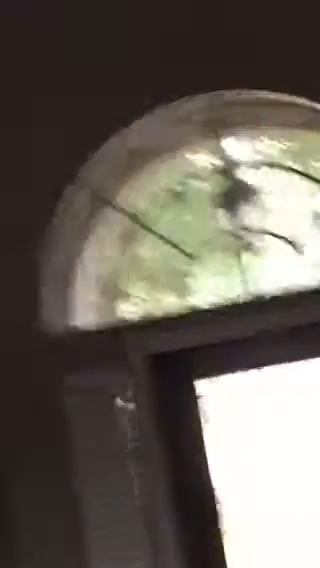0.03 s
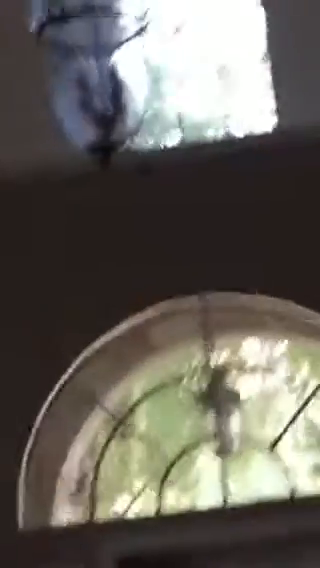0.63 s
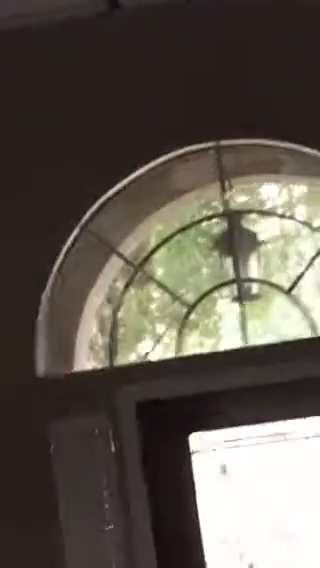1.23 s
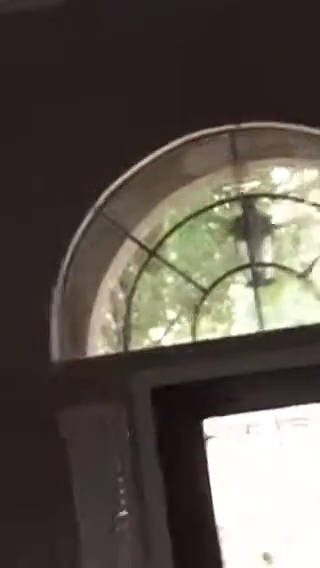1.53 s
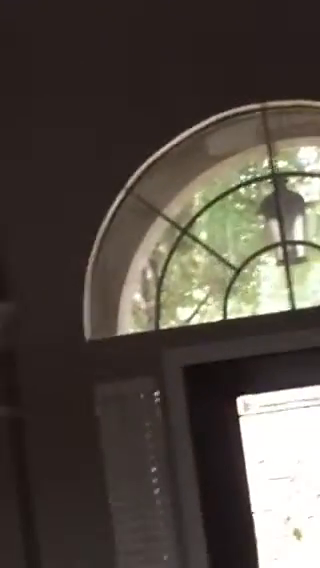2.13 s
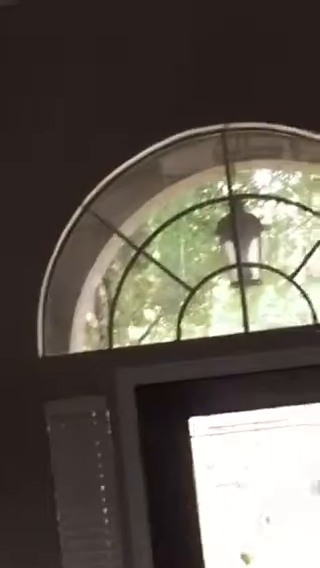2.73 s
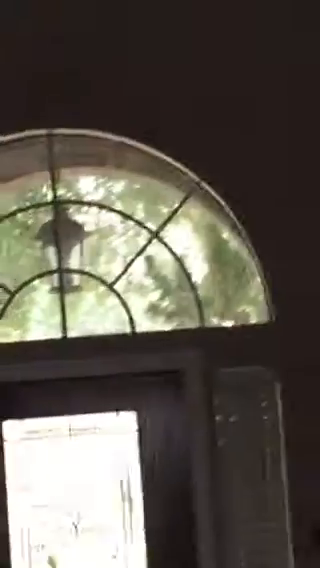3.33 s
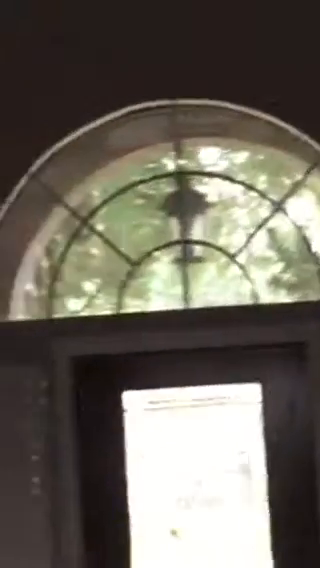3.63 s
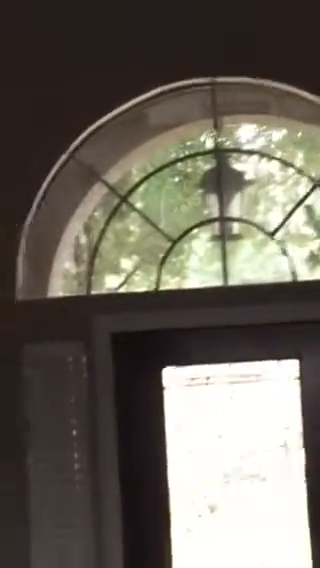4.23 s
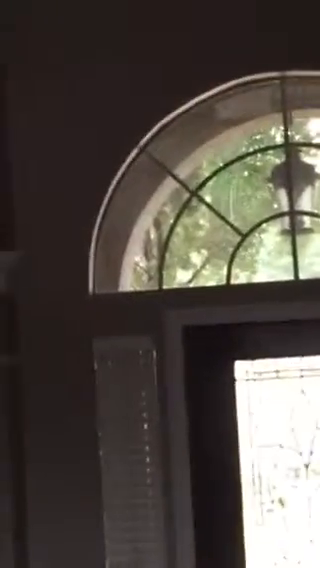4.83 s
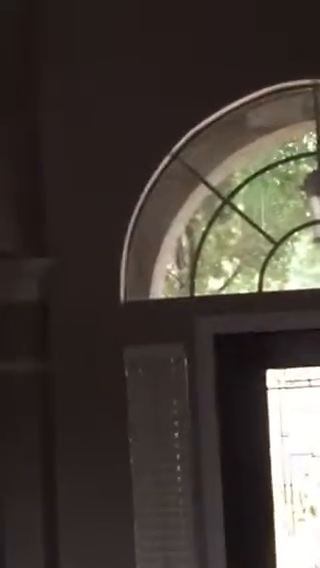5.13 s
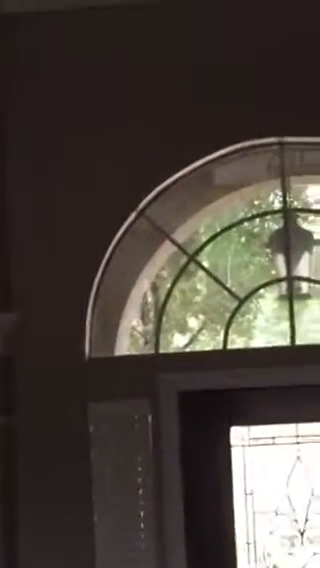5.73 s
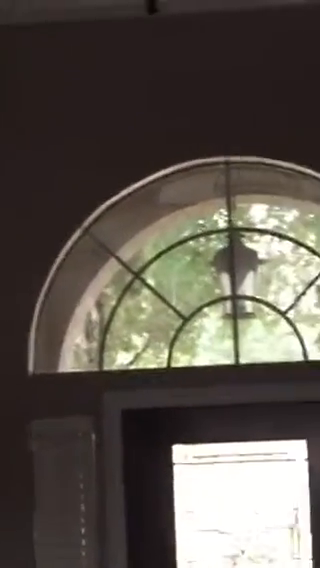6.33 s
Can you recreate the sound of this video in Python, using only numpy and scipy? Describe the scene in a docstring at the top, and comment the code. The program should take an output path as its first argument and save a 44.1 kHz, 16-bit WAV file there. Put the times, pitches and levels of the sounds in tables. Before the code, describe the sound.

In the tall, hard-walled entryway of a quiet house, someone knocks twice on a window a few metres from the microphone. The first knock thumps the pane, which rings briefly. The second scuffs and clacks the glass, rattling it in its frame. Both echo in the hall. Low ventilation rumble and faint hiss continue, with a few soft handling bumps on the phone.

```python
"""A low ventilation rumble and faint hiss fill the tall, hard-walled entryway of a quiet house.
A few metres away come two knocks on a window. The first thumps the pane and excites its modes;
the second scuffs it, then clacks the glass in its frame, which rattles briefly and settles with a thud.
The hall reverberates after each, and a hand shifting on a phone adds a few soft bumps."""
import sys
import numpy as np
from scipy import signal
from scipy.fft import rfft, irfft
from scipy.io import wavfile

SR = 44100
rng = np.random.default_rng(int(sys.argv[2]) if len(sys.argv) > 2 else 0)


def dump_mix(stems):
    """Bounce the given channels to the path in sys.argv[1] as a 16-bit WAV at rate SR."""
    frames = np.atleast_2d(stems).T  # one column per channel
    limited = np.clip(frames, -1, 1)  # hard clip at full scale
    pcm = np.round(limited * 32767).astype(np.int16)
    wavfile.write(sys.argv[1], SR, pcm)


N = 285768
T = np.arange(SR) / SR  # one second holds a blow and its echo


def undb(db):
    """Decibels to amplitude ratio."""
    return 10 ** (np.asarray(db) / 20)


def level(x, db):
    """Scale to an rms level."""
    return x * undb(db) / np.sqrt(np.mean(x ** 2))


def octaves(size):
    """Frequencies of a real spectrum, in octaves from 1 kHz."""
    return np.log2(np.maximum(np.fft.rfftfreq(size, 1 / SR), 1) / 1000)


def read(table, octave):
    """Interpolate a spectral envelope on a log-frequency axis."""
    hz, db = np.transpose(table)
    return np.interp(octave, np.log2(hz / 1000), db)


def colour(x, db):
    """Minimum-phase filter: folding the cepstrum makes the given gain curve causal."""
    cepstrum = irfft(np.log(undb(db)), len(x))
    cepstrum[1:len(x) // 2] *= 2
    cepstrum[len(x) // 2 + 1:] = 0
    return irfft(rfft(x) * np.exp(rfft(cepstrum)), len(x))


def resonance(x, hz, width_hz):
    """A resonance passes a band around its natural frequency, 6 dB down at the edges."""
    off_centre = (np.fft.rfftfreq(len(x), 1 / SR) - hz) / width_hz
    return colour(x, -20 * np.log10(1 + (2 * off_centre) ** 2))


def add(out, s, x):
    """Superpose a sound from time s."""
    start = int(s * SR)
    out[start:start + len(x)] += x[:N - start]


def ventilation(air_db=-61.5, flutter_per_s=24):
    """Ventilation noise drives low room modes; the bass flutters while the hiss stays smooth."""
    # spectrum of the air in the house: (frequency [Hz], relative level [dB])
    air_spectrum = [(22, -28), (36, -20), (62, -11.5), (80, -8.5), (112, -7.5), (140, -11), (215, -20.5),
                    (270, -25.5), (470, -31), (690, -31), (1400, -32.5), (3000, -38.5), (4900, -43.5),
                    (15000, -51)]
    # low room resonances: (frequency [Hz], bandwidth [Hz], level [dB])
    room_modes = [(91.15, 14.3, -62.5), (108.35, 14.5, -66)]
    air = level(colour(rng.standard_normal(N), read(air_spectrum, octaves(N))), air_db)
    bass = signal.sosfiltfilt(signal.butter(2, 200, fs=SR, output="sos"), air)
    rumble = sum(level(resonance(rng.standard_normal(N), hz, width), db) for hz, width, db in room_modes)
    flutter_db = 2.8 * np.interp(np.arange(N) / SR * flutter_per_s, np.arange(N), rng.standard_normal(N))
    return air - bass + (bass + rumble) * undb(flutter_db)


def contact(spectrum, fall_db, contact_s, dips=(), chatter_hz=900, chatter_db=-2):
    """Source and filter: dense resonances colour an impulse and its brief treble chatter."""
    chatter = level(rng.standard_normal(SR) * np.exp(-T / contact_s), chatter_db)
    highpass = signal.butter(2, chatter_hz, "high", fs=SR, output="sos")
    push = level(1. * (T == 0), 0) + signal.sosfilt(highpass, chatter)
    octave, f = octaves(SR), np.fft.rfftfreq(SR, 1 / SR)
    octaves_above_top = np.maximum(octave - np.log2(spectrum[-1][0] / 1000), 0)
    hollows = sum(db * np.exp(-(2 * (f - hz) / width) ** 2) for hz, width, db in dips)
    return colour(push, read(spectrum, octave) + fall_db * octaves_above_top + hollows)


def hall(x, direct_db=-12, early_db=-5, early_s=0.038, build_s=0.0053, t60_s=0.69, damp_hz=18000):
    """Reverberation: direct sound, reflections, doorway scatter and a tail whose treble dies first."""
    # first reflections from floor and walls: (delay [s], level re direct sound [dB])
    echoes = [(.0035, 1.5), (.0075, -1), (0.011, -19), (0.022, -22)]
    centres = np.arange(-4, 5)
    noise, octave = rfft(rng.standard_normal(SR)), octaves(SR)
    tail = np.zeros(SR)
    for centre in centres:
        band = irfft(noise * np.interp(octave, centres, centres == centre), SR)
        absorption = 1 + (1000 * 2. ** centre / damp_hz) ** 2
        tail += band * np.exp(-np.log(1000) * T * absorption / t60_s)
    tail *= 1 - np.exp(-T / build_s)
    scatter = rng.standard_normal(SR) * np.exp(-T / early_s)
    paths = np.zeros(SR)
    paths[0] = 1
    for delay, db in echoes:
        paths[int(delay * SR)] += undb(db)
    response = level(paths, direct_db) + level(scatter, early_db) + level(tail, 0)
    return signal.fftconvolve(x, response)[:SR]


def ring(modes, detune=0.00085, scatter_db=1, wet_db=-11):
    """Free vibration is a sum of damped modes; each blow excites them a little differently."""
    x = np.zeros(SR)
    for k, (hz, db, t60) in enumerate(modes):
        gain = (-1) ** k * undb(db + scatter_db * rng.standard_normal())
        tuned_hz = hz * (1 + detune * rng.standard_normal())
        x += gain * np.sin(2 * np.pi * tuned_hz * T) * np.exp(-np.log(1000) * T / t60)
    return level(x, 0) + level(hall(x), wet_db)


def burst(hz, width_hz, decay_s):
    """Decaying noise excites one heavily damped resonance."""
    return resonance(rng.standard_normal(SR) * np.exp(-T / decay_s), hz, width_hz)


def touches(table, bright_db, thin_db, contact_s, linger_s=0):
    """Spectral tilt: each dB lighter adds thin_db per octave and linger_s of chatter decay time."""
    hardest_db = max(db for _, db in table)
    for s, db in table:
        lighter_db = hardest_db - db
        tilt_db = (bright_db + thin_db * lighter_db) * np.clip(octaves(SR), -3, 2)
        yield s, db, lighter_db, tilt_db, contact_s + linger_s * lighter_db


def blows(hits, spectrum, modes, fall_db, ring_db, ring_loss, direct_db, early_db,
          tick_db, tick_hz, tick_width_hz, tick_s, dips=()):
    """Impact excitation gives a reverberant crack, a ring and a tick; lighter blows ring less."""
    out = np.zeros(N)
    for s, db, lighter_db, tilt_db, contact_s in hits:
        crack = hall(contact(spectrum, fall_db, contact_s, dips), direct_db, early_db)
        ringing = level(ring(modes), ring_db - ring_loss * lighter_db)
        tick = level(burst(tick_hz, tick_width_hz, tick_s), tick_db)
        add(out, s, level(colour(level(crack, 0) + ringing + tick, tilt_db), db))
    return out


def pane_knock():
    """A blow and its bounce set the pane's bending modes ringing."""
    # the blow and its bounce: (time [s], level [dB])
    knocks = [(0.5253, -45.5), (0.5333, -50.5)]
    # envelope of the pane's dense, damped resonances: (frequency [Hz], gain [dB])
    spectrum = [(50, -26.5), (125, -5), (190, -4), (270, -4.5), (390, -4), (490, -13), (820, -11.5),
                (1400, -21), (2000, -18), (3400, -18.5), (5000, -20.5), (6900, -23.5)]
    # the pane's own modes: (frequency [Hz], relative level [dB], T60 [s])
    modes = [(125.7, -0.5, 0.43), (227, 4, 0.25), (282.4, 5.5, 0.19), (283, -9, 0.18), (329.3, -1.5, 0.4),
             (381, -1.5, 0.78), (676, -29, 0.46), (853, -16, 1), (1448, -14.5, 0.89), (1650, -19, 0.9)]
    # bands in which the pane radiates little: (frequency [Hz], width [Hz], gain [dB])
    dips = [(1023, 370, -15.5), (2570, 460, -12), (3950, 590, -12.5)]
    hits = touches(knocks, bright_db=0, thin_db=0.22, contact_s=0.011)
    return blows(hits, spectrum, modes, fall_db=-38, ring_db=-3.5, ring_loss=3, direct_db=-13.5,
                 early_db=-8, tick_db=-19, tick_hz=8100, tick_width_hz=3200, tick_s=0.025, dips=dips)


def scuffs():
    """Grazing contact passes on too little energy to ring the glass."""
    # light touches: (time [s], level [dB])
    grazes = [(0.882, -83), (0.913, -81), (1.1587, -53), (1.172, -60), (1.378, -78)]
    # envelope of a graze's damped resonances: (frequency [Hz], gain [dB])
    spectrum = [(40, -42), (85, 16), (130, 7.5), (340, -1.5), (520, -19), (900, -6.5), (2300, -8.5),
                (2700, -16.5), (4300, -17), (8500, -22.5)]
    hits = touches(grazes, bright_db=0.5, thin_db=0.28, contact_s=0.0039, linger_s=0.00035)
    out = np.zeros(N)
    for s, db, _, tilt_db, contact_s in hits:
        graze = contact(spectrum, fall_db=-16, contact_s=contact_s)
        echoing = hall(graze, direct_db=-11.5, early_db=-3.5, early_s=0.024)
        add(out, s, level(colour(echoing, tilt_db), db))
    return out


def hand_bumps():
    """Structure-borne sound: each shift of the grip is a dull burst through the phone's case."""
    # shifts of the grip: (time [s], level [dB])
    bumps = [(1.138, -72), (2.269, -75), (2.375, -73.5), (3.249, -77), (3.904, -75.5), (4.032, -77)]
    out = np.zeros(N)
    for s, db in bumps:
        add(out, s, level(burst(hz=165, width_hz=75, decay_s=0.014), db))
    return out


def frame_rattle():
    """Repeated impacts of the glass on its frame excite their coupled modes."""
    # the glass hitting its frame: (time [s], level [dB])
    clacks = [(1.1978, -50), (1.216, -56), (1.231, -53.5), (1.299, -56), (1.325, -59.5)]
    # envelope of the frame's dense, damped resonances: (frequency [Hz], gain [dB])
    spectrum = [(50, -30), (95, -8), (160, -8), (260, -11), (350, 4), (470, -10), (680, -2), (1000, -12.5),
                (1800, -12), (2250, -8.5), (2700, -16), (3500, -12), (4500, -18), (5800, -22.5)]
    # modes of glass and frame together: (frequency [Hz], relative level [dB], T60 [s])
    modes = [(93.4, -16, 0.52), (315.6, 9.5, 0.69), (336.5, 10.5, 0.16), (584, -10, 0.62), (651, 5, 0.51),
             (864, 2, 0.28), (1223, 8.5, 0.34), (1690, -10, 0.29), (1520, 4, 0.43), (2220, 6.5, 0.49),
             (2250, -10, .3), (2280, 4.5, 0.43), (2260, 9, 0.22), (2920, -13, 0.33), (3230, -23, 0.2),
             (3240, -17, 0.27), (3933, 0, 0.57)]
    hits = touches(clacks, bright_db=-0.1, thin_db=0.61, contact_s=0.0016, linger_s=0.00075)
    return blows(hits, spectrum, modes, fall_db=-44, ring_db=1.5, ring_loss=0.5, direct_db=-2.5,
                 early_db=-2, tick_db=-31, tick_hz=8800, tick_width_hz=9000, tick_s=0.07)


def settling_thud(start_s=1.312, sway_hz=95, decay_s=0.016, sway_db=-65, push_db=-62):
    """Damped oscillation: the glass settles with a sway at its lowest mode and a dull push of sound."""
    out = np.zeros(N)
    sway = np.sin(2 * np.pi * sway_hz * T) * T * np.exp(-T / decay_s)
    push = hall(burst(hz=360, width_hz=450, decay_s=0.022), direct_db=8.5)
    add(out, start_s, level(sway, sway_db) + level(push, push_db))
    return out


def scene():
    """The pressures from window, hand and house superpose in one channel."""
    window = pane_knock() + frame_rattle() + settling_thud() + scuffs()
    return (window + hand_bumps() + ventilation())[None]


def record(dry):
    """Band limiting: a steep low-pass removes the treble above 15.3 kHz."""
    return signal.sosfilt(signal.ellip(10, 0.2, 70, 15300, fs=SR, output="sos"), dry)


dry = scene()
out = record(dry)
dump_mix(out)
```